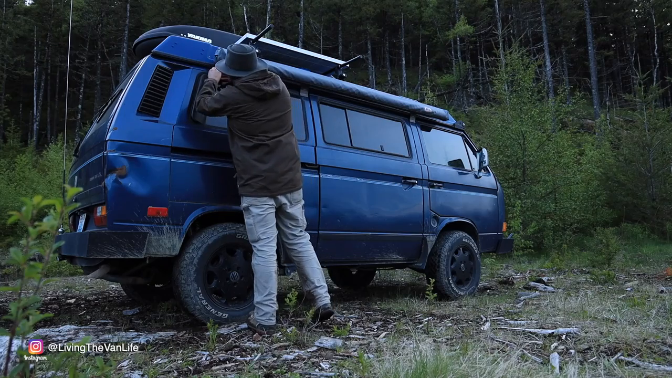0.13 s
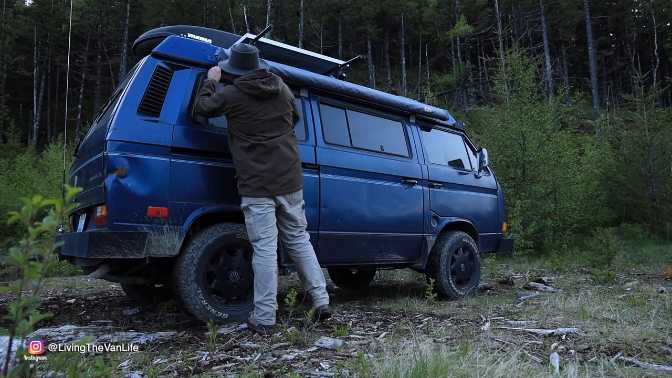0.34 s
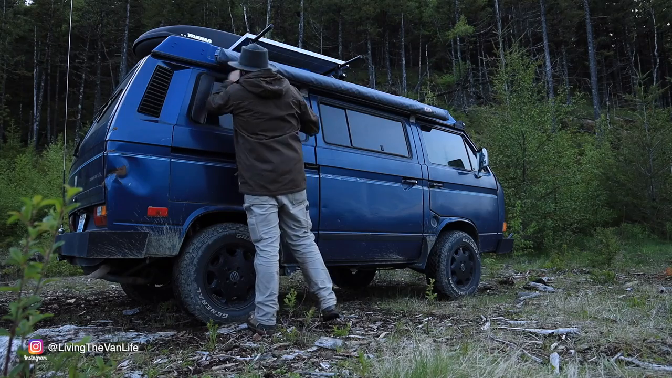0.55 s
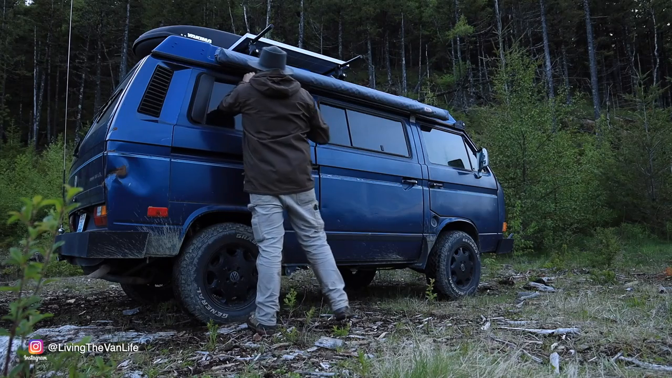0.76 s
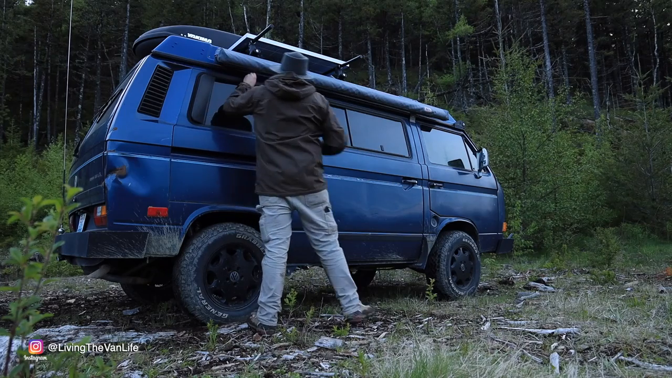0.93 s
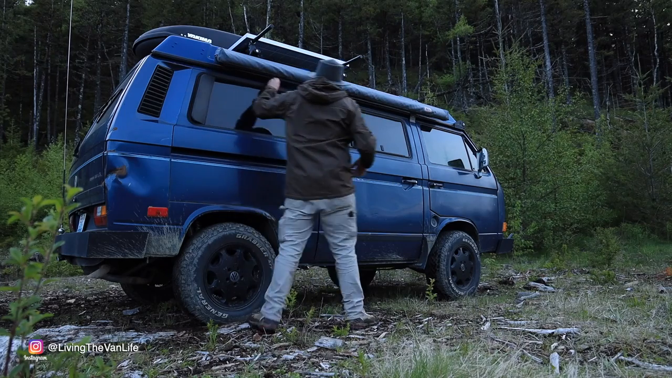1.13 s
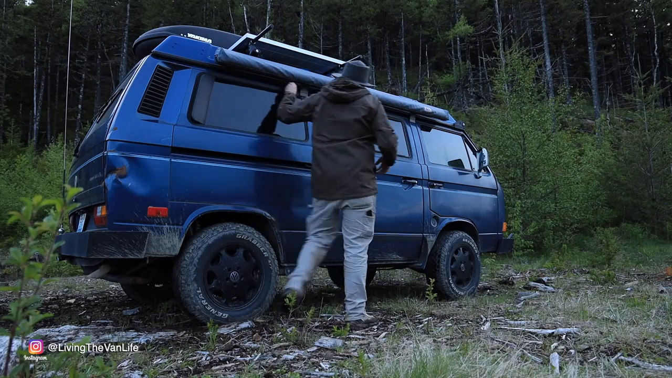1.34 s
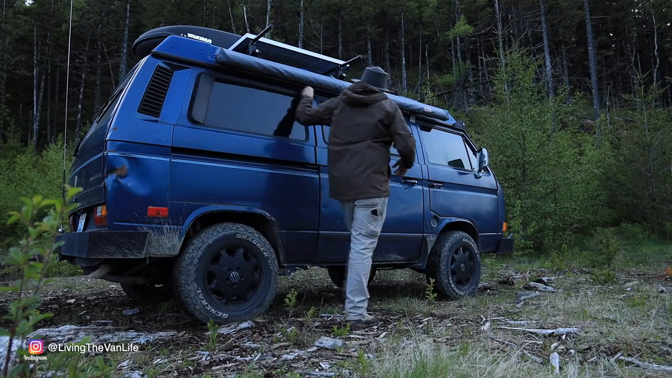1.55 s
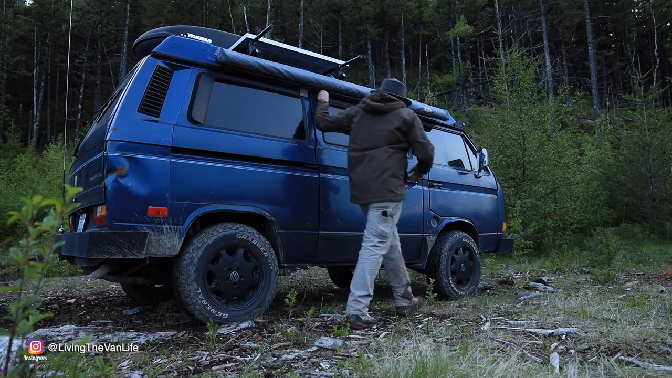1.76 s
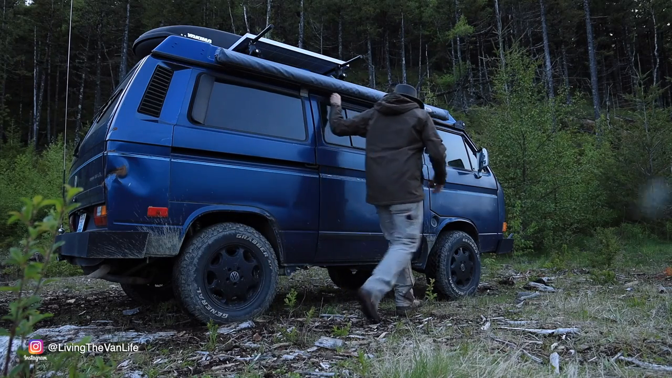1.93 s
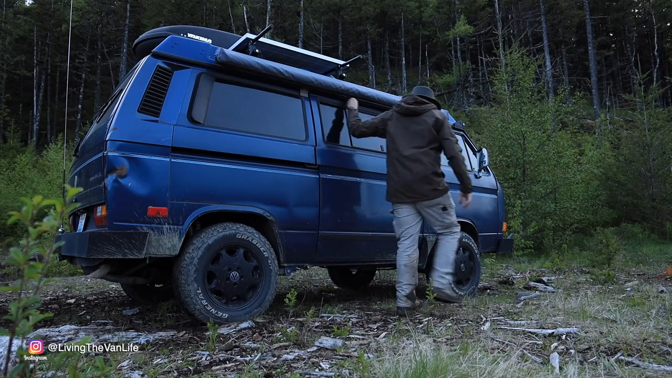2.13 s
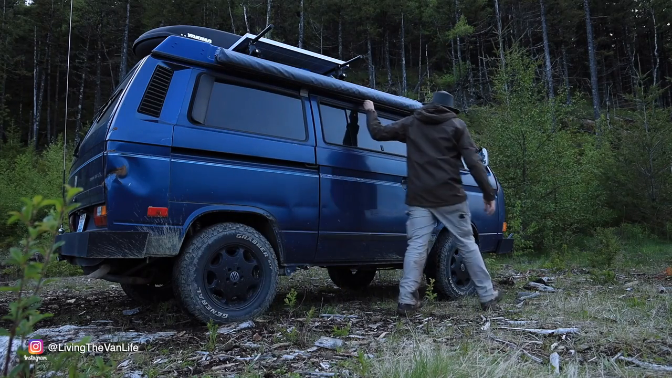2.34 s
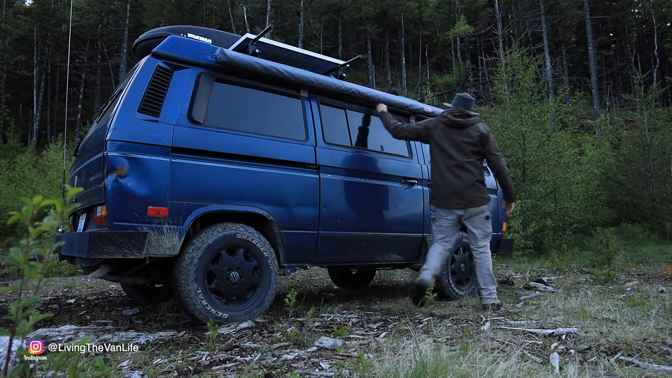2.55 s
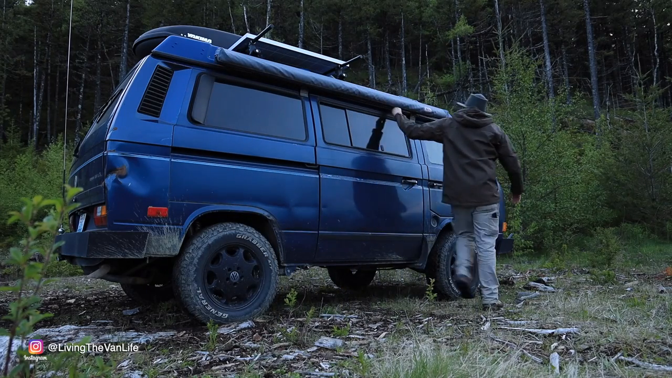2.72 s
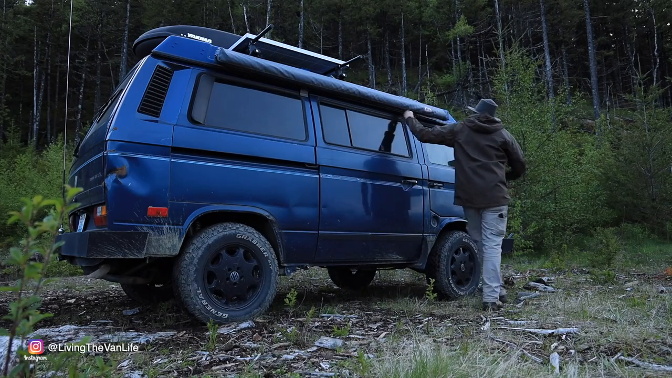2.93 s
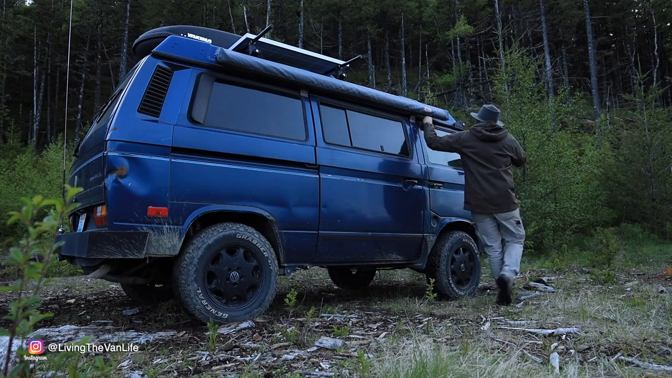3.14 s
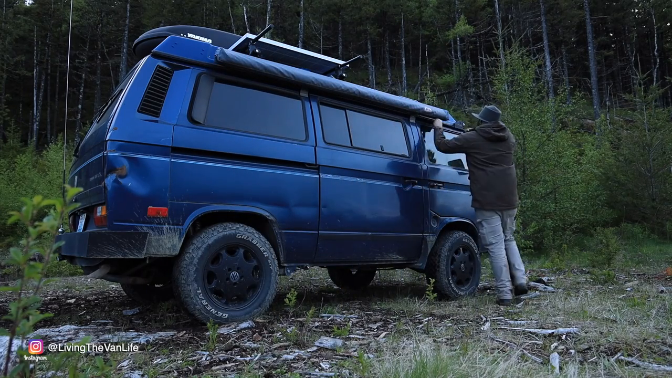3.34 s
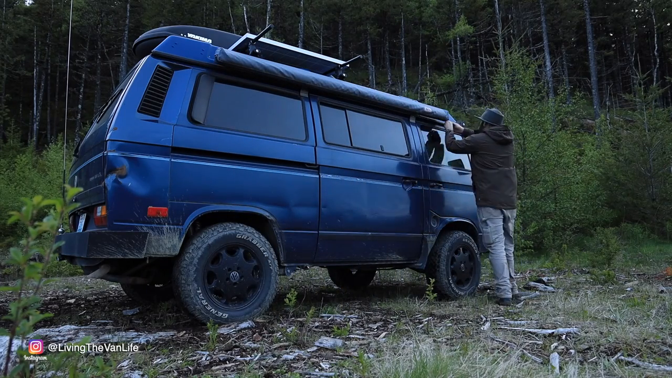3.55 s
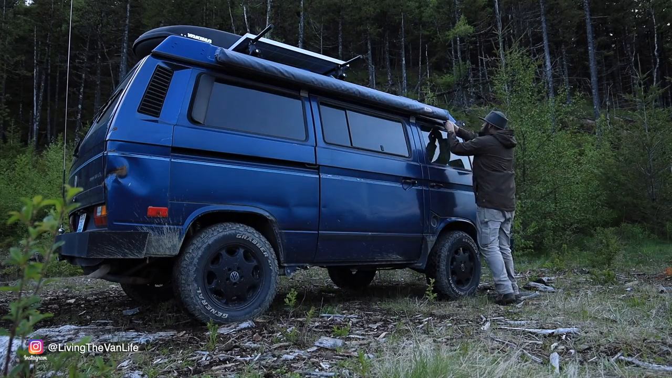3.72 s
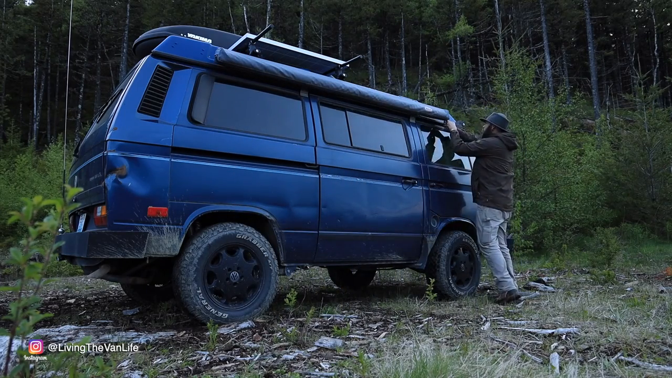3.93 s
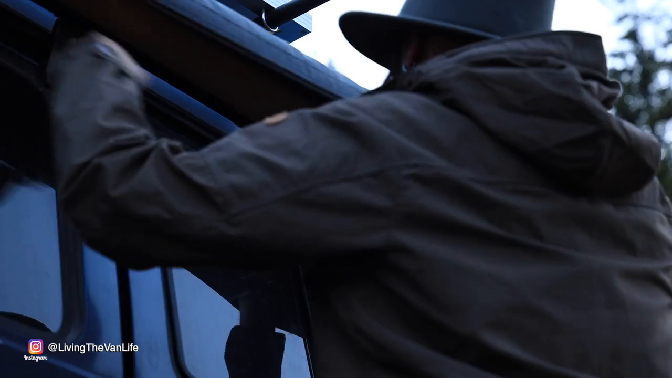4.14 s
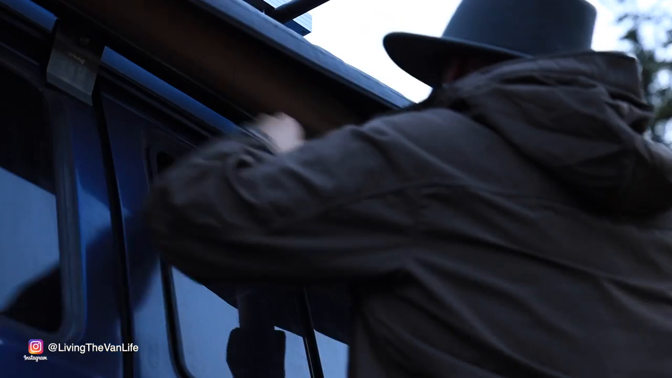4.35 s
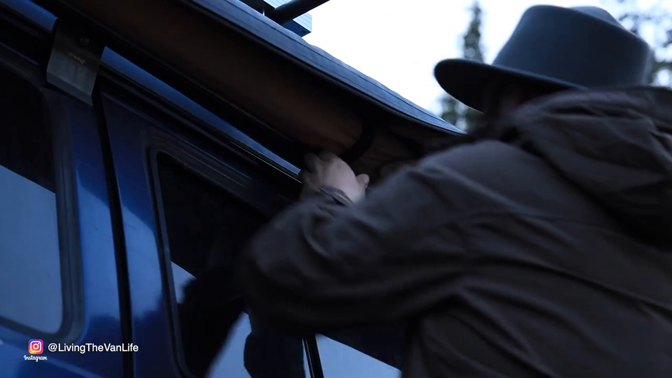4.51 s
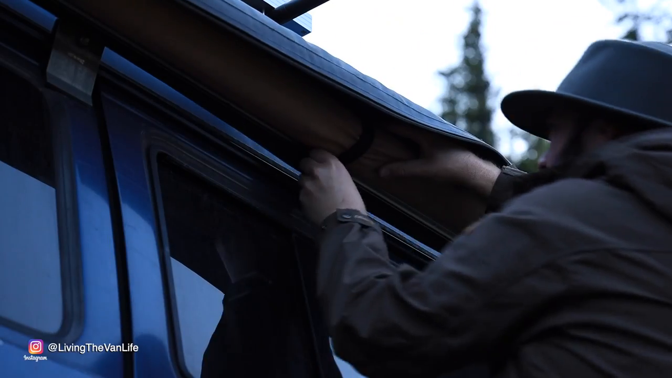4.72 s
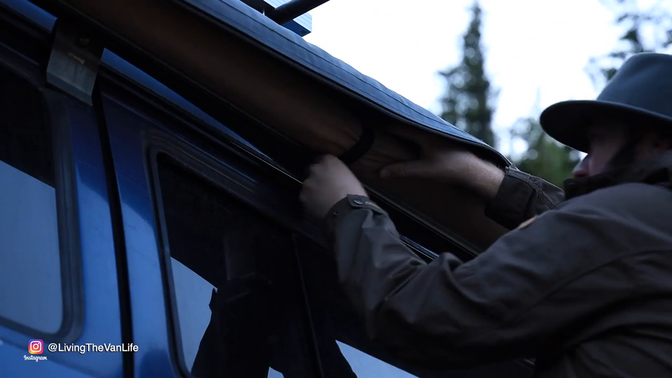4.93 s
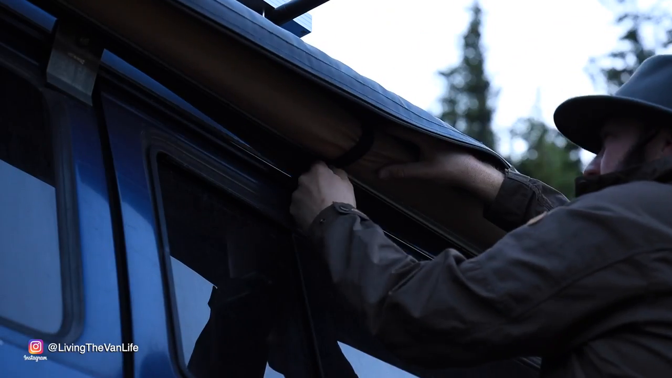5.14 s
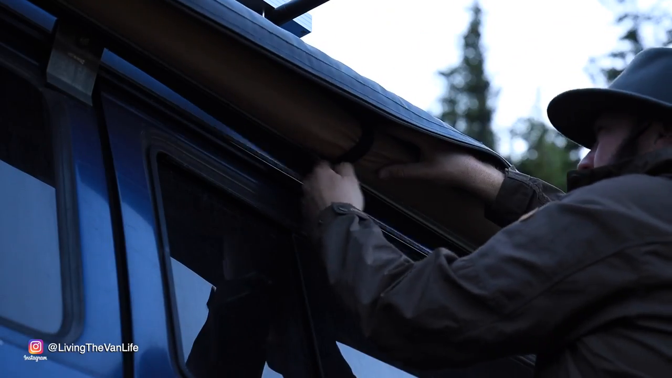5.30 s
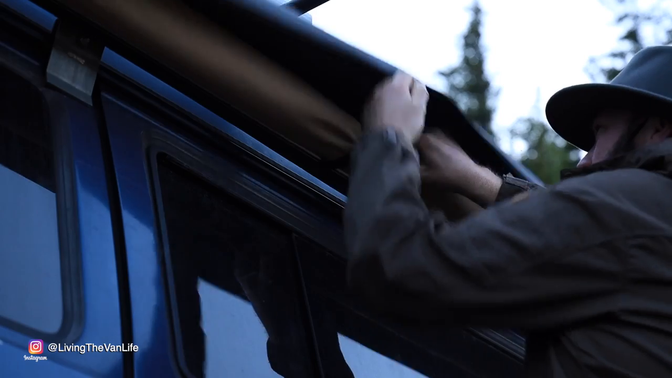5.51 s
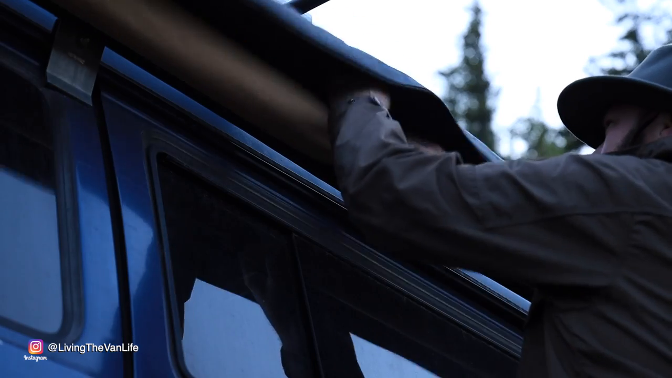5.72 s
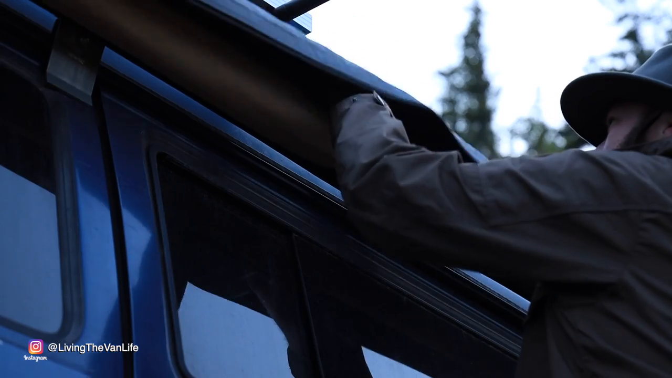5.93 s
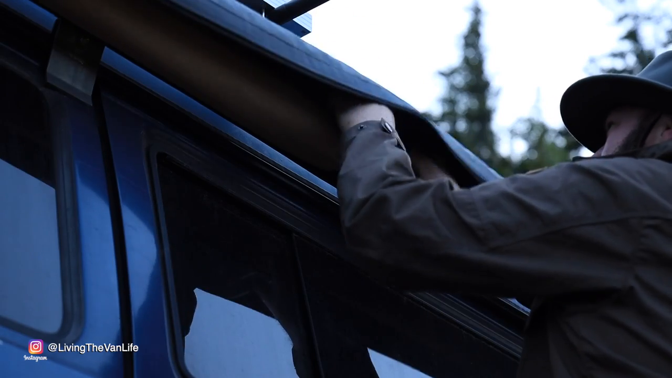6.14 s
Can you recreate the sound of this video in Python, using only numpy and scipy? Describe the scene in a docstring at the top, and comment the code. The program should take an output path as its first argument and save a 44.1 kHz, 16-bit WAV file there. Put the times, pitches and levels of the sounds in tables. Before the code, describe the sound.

A long, coarse zipper is tugged open in several buzzing strokes on a taut awning bag, then stiff fabric is handled and crinkled in quiet woods.

```python
"""A quiet forest clearing, close to an awning bag on the side of a van: a long zipper is pulled open in strokes.
The slider knocks as it is tugged free; its teeth then snap at the speed of the hand, buzz and ring the taut cover.
A last quick slip squeaks. Afterwards hands grip, crinkle and fold back the stiff cover: filtered noise and ticks.
The microphone also takes in scatter from van and ground, a dull return from the trees, still air and a low drone."""
import sys
import numpy as np
from scipy import signal
from scipy.fft import rfft, irfft
from scipy.io import wavfile
from scipy.ndimage import uniform_filter1d

SR = 44100
rng = np.random.default_rng(int(sys.argv[2]) if len(sys.argv) > 2 else 0)


def transcribe(u):
    """Save the signal u as a 16-bit wav file named by the first command-line argument.

    u: samples, shape (n,) or (channels, n), limited to [-1, 1]; the rate is SR.
    q: integer samples, one column per channel.
    """
    v = np.clip(np.atleast_2d(u).T, -1, 1)
    q = np.round(v * 32767).astype(np.int16)
    wavfile.write(sys.argv[1], SR, q)


N = 272097
TIME = np.arange(N) / SR

# spectrum of friction against the slider and cover: f/Hz, relative level/dB per Hz
SCRAPE_SPECTRUM = [(200, -11), (420, 4), (1250, 3), (3700, -6.5), (4700, -20), (16000, -40.5)]
# spectrum of bright ticks and snaps, as of a stiff crease letting go: f/Hz, relative level/dB per Hz
TICK_SPECTRUM = [(300, 3.5), (1500, 4.5), (3500, 7), (5400, -10), (7600, -7), (16000, -24.5)]


def undb(db):
    """Decibels to gain."""
    return 10 ** (np.asarray(db) / 20)


def unit(x):
    """Scale to rms 1."""
    return x / np.sqrt(np.mean(x ** 2))


def add(out, s, sound):
    """Mix a short sound in at time s."""
    i = max(int(s * SR), 0)
    out[i:i + len(sound)] += sound[:N - i]


def colour(x, points, size=2048):
    """Causal minimum-phase filter with a (Hz, dB) spectrum and unit energy."""
    hz, db = np.transpose(points)
    log_gain = np.interp(np.log(np.fft.rfftfreq(size, 1 / SR) + 1), np.log(hz), np.log(undb(db)))
    cepstrum = irfft(log_gain)[:size // 2]
    cepstrum[1:] *= 2
    response = irfft(np.exp(rfft(cepstrum, size)))
    return signal.oaconvolve(x, response / np.linalg.norm(response))[:len(x)]


def resonate(x, hz, q):
    """Two-pole resonance, gain 1 at the centre."""
    return signal.lfilter(*signal.iirpeak(hz, q, fs=SR), x)


def walk(rate):
    """Smooth random wandering with a spread near 1, given fresh values at this rate in Hz."""
    k = int(SR / rate)
    steps = np.repeat(rng.standard_normal(N // k + 1), k)
    return 1.2 * uniform_filter1d(steps, k)[:N]


def steady(x, size=900):
    """Even out the slow level over size samples and leave the grain."""
    return x / np.sqrt(np.abs(uniform_filter1d(x ** 2, size)) + 1e-9)


def forest(air_db=-50, drone_hz=47.1, drone_db=-53, q=10):
    """Still air in the trees is coloured noise; a faint low drone is noise through a narrow resonance."""
    # still air: f/Hz, relative level/dB per Hz
    air_spectrum = [(30, -5), (150, 12), (650, 3), (1200, -3), (3500, -8), (5000, -17), (16000, -24.5)]
    air = unit(colour(rng.standard_normal(N), air_spectrum)) * undb(air_db)
    drone = resonate(resonate(rng.standard_normal(N), drone_hz, q), drone_hz, q)
    return air + undb(drone_db) * steady(drone, size=2800)


def knocks(cycles=0.85, crack_s=0.0027, ring_db=-19, ring_s=0.014, bag_hz=720, snap_db=-7,
           thud_hz=175, thud_db=-24, thud_s=0.016):
    """The cover swings up and dies within a few cycles; a crack leads, and the bag thuds and rings on faintly."""
    # knocks of the slider and snaps of the taut cover:
    # t/s, level/dB, ring f/Hz, crack level/dB (before halving, relative to the knock)
    knock_list = [(0.0667, -17.5, 646, 2), (0.091, -10.5, 614, -7), (0.1668, -14.5, 585, -6),
                  (0.2972, -11.5, 590, -6), (0.445, -18.5, 467, -2), (0.456, -15.5, 517, -11),
                  (0.861, -30, 527, -9), (0.917, -34.5, 700, 6.5), (1.58, -16.5, 405, -25),
                  (2.468, -17.5, 317, -6), (3.149, -20, 606.8, 8.5), (4.184, -13, 580, -10),
                  (4.45, -23, 1120, -6.5), (5.088, -12.5, 774, -20), (5.4764, -4.5, 440, -36),
                  (5.736, -22, 388, -3), (5.879, -21, 523, 8.5)]
    out, t = np.zeros(N), TIME[:SR // 10]
    for s, db, hz, crack_db in knock_list:
        noise = rng.standard_normal((3, len(t)))
        age = t * hz / cycles  # 1 at the height of the swing
        swing = -(age * np.exp(1 - age)) ** 2 * np.cos(2 * np.pi * hz * t + np.pi)
        grit = colour(noise[0], SCRAPE_SPECTRUM) + undb(snap_db) * colour(noise[2], TICK_SPECTRUM)
        crack = .5 * grit * np.exp(-t / crack_s)
        ring = unit(resonate(resonate(noise[1], hz, q=1.6), bag_hz, q=10.0)) * np.exp(-t / ring_s)
        thud = np.sin(2 * np.pi * thud_hz * t) * np.exp(-t / thud_s)
        knock = swing + undb(crack_db) * crack + undb(ring_db) * ring + undb(thud_db) * thud
        add(out, s, undb(db) * knock)
    return out


def pulling(overlap=12, crawl_hz=175.04, shape=1.7, uneven_per_octave=0.1705, treble_db_per_octave=2):
    """Each pull speeds up and slows down; level, unevenness and treble follow its speed, and the fastest leads."""
    # pulls of the hand on the slider: t/s at top speed, top speed f/Hz in teeth per second, speed-up t/s,
    # slow-down t/s, level/dB at top speed, level lost/dB per octave of slowing, unevenness 0-1 at top speed,
    # cover resonance f/Hz, its lift/dB, treble level/dB at top speed
    pulls = [(0.558, 702.3, 0.1, .125, -23.5, 4, 0.24, 496, 8.5, 5.5),
             (0.96, 229.5, 0.039, 0.068, -26, 2, 0.47, 493, 7, 3.5),
             (1.075, 475, 0.09, 0.27, -19.5, 11.5, 0.29, 406.8, 3.5, 5.5),
             (1.399, 376, .24, .095, -25, 11, 0.48, 1080, 6, 5.5),
             (1.502, 387.7, .2, 0.18, -23, 2.5, .4, 388.3, 5.5, 5.5),
             (1.81, 368.6, 0.41, 0.35, -23.5, 13, 0.52, 1147, 7, 5),
             (2.128, 675.2, 0.051, 0.17, -23.5, 3, 0.26, 1122, 7.5, 7),
             (2.255, 469.7, 0.048, 0.099, -24, 10.5, 0.34, 1169, 2.5, 6.5),
             (2.455, 284.4, 0.076, 0.21, -28, 7.5, 0.59, 1130, 7, 0),
             (2.579, 875.4, 0.088, .125, -22.5, 4.5, .27, 851, 8.5, 7),
             (2.998, 662.6, 0.19, .2, -24, 6, .3, 1260, 4.5, 7.5),
             (3.125, 515, 0.1, 0.18, -26.5, 6, 0.4, 1300, 8, 4.5),
             (3.437, 352.3, 0.65, 0.22, -26, 18.5, 0.43, 720, 8.5, 1),
             (3.525, 498.5, 0.13, 0.035, -22, 5.5, 0.31, 502.3, -2.5, -4)]
    columns = np.transpose(pulls)[:, :, None]
    s, top_hz, rise_s, fall_s, db, swell_db, uneven, cover_hz, cover_db, treble_db = columns
    t = TIME[::40]  # hand motion is slow enough for a coarse clock
    age = np.abs(t - s) / np.where(t < s, rise_s, fall_s)
    # shape 1 is a pointed jerk, 2 a round bell
    speed = top_hz * np.exp(-np.minimum(age ** shape, 4))
    slower = np.log2(top_hz / speed)  # octaves under top speed
    # slowing down makes the teeth stumble and dulls them; each pull keeps at least a crawl
    controls = (np.maximum(speed, crawl_hz),
                db - swell_db * slower,
                np.minimum(uneven + uneven_per_octave * slower, .6),
                cover_hz,
                cover_db,
                treble_db - treble_db_per_octave * slower)
    lead = (speed / speed.max(0)) ** overlap
    return [np.interp(TIME, t, (lead * c).sum(0) / lead.sum(0)) for c in controls]


def clicks(places, sizes, order=8):
    """Band-limited impulses at fractional sample places."""
    out = np.zeros(N)
    taps = places.astype(int)[:, None] + np.arange(1 - order, order + 1)
    offset = taps - places[:, None]
    kernel = np.sinc(offset) * np.sinc(offset / order)
    np.add.at(out, np.clip(taps, 0, N - 1), sizes[:, None] * kernel)
    return out


def folds(x, spread_s=0.003013, drift_s=0.00018, count=6):
    """Paths of drifting length through the folds of the cover, added with alternating sign."""
    out = np.zeros(N)
    for k in range(count):
        arrival = TIME - spread_s * rng.random() - drift_s * walk(18)
        out += (-1) ** k * np.interp(arrival, TIME, x)
    return out


def flexing(x, strain, flex_db=3.8, lowest_hz=450, q=4, count=7):
    """The cover flexes under strain: resonances half an octave apart swell and fade, and break up the tone."""
    for k in range(count):
        lift_db = flex_db * np.sqrt(strain) * np.clip(walk(70), -2, 1)
        x = x + (undb(lift_db) - 1) * resonate(x, lowest_hz * 2 ** (k / 2), q)
    return x


def glide_resonance(x, hz, width_hz):
    """Resonance whose centre moves: turn the sound down to 0 Hz, smooth it, turn it back."""
    turn = np.exp(2j * np.pi * np.cumsum(hz) / SR)
    pole = np.exp(-np.pi * width_hz / SR)
    return 2 * np.real(turn * signal.lfilter([1 - pole], [1, -pole], x * turn.conj()))


def zipper(jitter=0.08, waver=.08, scatter_db=3, scrape_s=0.0019, scrape_db=-5.5, cover_width_hz=140,
           treble_hz=1700, fold_hz=520, surge_db=1.0, judder_db=0.96, patch_q=7.0, start_s=0.053, stop_s=0.028):
    """Each tooth snaps out of the slider, rings the cover and scrapes briefly."""
    # ring of one tooth: f/Hz, relative level/dB per Hz
    tooth_spectrum = [(150, -19), (250, -3), (400, 8), (700, 4.5), (950, -1.5), (1200, 5), (1550, -2),
                      (3700, -8.5), (4600, -19.5), (7000, -26.5), (16000, -40.5)]
    # stretches where the slider runs free, sticking in between: from t/s, to t/s
    runs = [(0.425, 0.729), (0.907, 3.65)]
    # patches of cover the slider passes, tight ones ring out and slack ones swallow a pitch:
    # t/s at the middle, Gaussian half length t/s, ring f/Hz, lift level/dB
    patches = [(0.524, 0.0077, 560, 5.5), (0.587, 0.025, 2070, 9), (0.652, 0.024, 1470, 14),
               (1.375, 0.028, 3600, 9.5), (1.414, .012, 1111, 6.5), (1.898, 0.023, 4160, 11),
               (1.886, .025, 5180, 14.5), (2.128, 0.019, 673, 11.5), (2.161, .014, 1187, 8),
               (2.291, 0.017, 1190, 12), (2.522, 0.011, 1140, 11), (2.57, 0.026, 4064, 8),
               (2.669, .035, 1263, 8.5), (2.84, 0.023, 729.3, 11.5), (3.025, 0.031, 1230, 6.5),
               (3.195, 0.021, 798.6, 12), (3.333, 0.11, 336, -13)]
    rate, level_db, uneven, cover_hz, cover_db, treble_db = pulling()
    passed = np.cumsum(rate * (1 + waver * uneven * walk(90))) / SR  # teeth so far
    teeth = np.arange(1, int(passed[-1]))
    chance = rng.standard_normal((len(teeth), 2)).T
    rough = np.interp(teeth, passed, uneven)
    places = np.interp(teeth + jitter * rough * chance[0], passed, np.arange(N))
    snaps = -clicks(places, undb(scatter_db * rough * chance[1]))

    # friction dies away quickly after each tooth, so slow pulls rasp and fast ones sing
    grip = signal.lfilter([1], [1, -np.exp(-1 / (scrape_s * SR))], snaps)
    friction = steady(colour(grip * rng.standard_normal(N), SCRAPE_SPECTRUM))
    # the buzz takes on the tooth resonances
    buzz = colour(steady(snaps), tooth_spectrum) + 2 * uneven * undb(scrape_db) * friction

    # slow teeth click dryly; fast ones shake the folds, which scatter their treble
    treble = signal.sosfiltfilt(signal.butter(2, treble_hz, "high", fs=SR, output="sos"), buzz)
    fold = rate / fold_hz  # at 1 as much treble is scattered as goes straight through
    scattered = (treble + fold * np.std(treble) * steady(folds(treble))) / np.hypot(1, fold)
    brightened = buzz - treble + undb(treble_db + surge_db * walk(40)) * scattered
    buzz = flexing(brightened, np.minimum(fold, 1) ** 2)

    # the taut stretch of cover beside the slider rings at its own pitch
    buzz = buzz + (undb(cover_db) - 1) * glide_resonance(buzz, cover_hz, cover_width_hz)
    moving = np.zeros(N)
    for start, stop in runs:
        # it takes start_s to get going and stop_s to come to rest
        moving += np.clip(np.minimum((TIME - start) / start_s, (stop - TIME) / stop_s), 0, 1)
    buzz = steady(buzz, size=4400) * undb(level_db + judder_db * uneven * walk(110)) * moving

    out = buzz.copy()
    for s, length, hz, db in patches:
        nearness = np.exp(-.5 * ((TIME - s) / length) ** 2)
        out += (undb(db) - 1) * nearness * resonate(buzz, hz, patch_q)
    return out


def ticks(snap_s=0.0016, tail_db=-12.0, tail_s=0.01, gain_db=-7.0, crackle_db=4):
    """A tooth or a crease lets go in a bright tick of noise with a short crackling tail."""
    # bright ticks: one zipper tooth at the first pull, then creases of the stiff cover flipping over:
    # t/s, level/dB (before gain_db and the tick spectrum)
    tick_list = [(0.435, -27.5), (5.037, -25), (5.109, -25), (5.312, -24.5), (5.341, -18), (5.37, -15.5),
                 (5.392, -14.5), (5.406, -16), (5.435, -15), (5.448, -30), (5.463, -13), (5.491, -20),
                 (5.496, -19.5), (5.514, -19), (5.547, -22)]
    out, t = np.zeros(N), TIME[:SR // 20]
    crackle = unit(undb(crackle_db * walk(900)))
    for s, db in tick_list:
        tail = undb(tail_db) * np.exp(-t / tail_s) * np.interp(s + t, TIME, crackle)
        add(out, s, undb(db + gain_db) * (np.exp(-t / snap_s) + tail) * rng.standard_normal(len(t)))
    return colour(out, TICK_SPECTRUM)


def bumps(q=1.0):
    """Soft pushes of air and ground: noise swelling and fading, each round its own low pitch."""
    # dull bumps of boots and billowing cloth: t/s at the middle, level/dB, Gaussian half length t/s, f/Hz
    pushes = [(1.785, -32.5, 0.021, 165), (2.822, -28.5, 0.014, 299.4), (4.897, -38, 0.0097, 332.4),
              (5.648, -39.5, 0.022, 133), (5.724, -32, 0.017, 170), (5.879, -30, 0.0066, 270)]
    out = np.zeros(N)
    for s, db, length, hz in pushes:
        low = resonate(resonate(rng.standard_normal(N), hz, q), hz, q)
        out += undb(db) * steady(low) * np.exp(-.5 * ((TIME - s) / length) ** 2)
    return out


def squeak(waver=.06, overtone_db=-21, rasp_db=-9, air_db=-25):
    """A last quick slip at the end of the bag: a gliding whistle, faint overtones, a light rasp and airy hiss."""
    # course of the whistle: t/s, f/Hz (before wavering), level/dB
    glide = [(3.722, 903, -48), (3.737, 995, -35.5), (3.795, 1152, -30), (3.814, 1167, -35.5),
             (3.832, 1898, -40.5), (3.847, 1230, -38.5), (3.878, 847, -49)]
    s, hz, db = np.transpose(glide)
    phase = 2 * np.pi * np.cumsum(np.interp(TIME, s, hz) * (1 + waver * walk(600))) / SR
    whistle = unit(np.sin(phase) + undb(overtone_db) * (np.sin(2 * phase) + np.sin(3 * phase)))
    noise = rng.standard_normal(N)
    grip = undb(np.interp(TIME, s, db)) * (TIME > s[0]) * (TIME < s[-1])
    hiss = undb(rasp_db) * colour(noise, SCRAPE_SPECTRUM) + undb(air_db) * noise
    # the rasp swells less than the tone
    return grip * whistle + np.sqrt(grip * grip.max()) * hiss


def rustle(grain_db=7, flutter_db=2.0, ring_db=2, q=2.5, attack_s=0.0086, release_s=0.019,
           handling_s=4.13, sleeves_db=-51):
    """Cloth slides on cloth in tiny uneven slips; each rub swells, holds, dies away and rings its patch of cover."""
    # cloth on cloth: f/Hz, relative level/dB per Hz
    cloth_spectrum = [(100, -11), (400, -1.5), (1100, -7), (1600, -9), (3600, -10.5), (4700, -22),
                      (7500, -25), (16000, -40.5)]
    # rubs of hands and sleeves along the cover: start t/s, length t/s, level/dB, ring f/Hz
    rubs = [(4.129, 0.037, -40.5, 695), (4.172, 0.065, -36.5, 413), (4.304, 0.1, -47.5, 1310),
            (4.442, 0.11, -41, 1140), (4.582, 0.17, -47.5, 1190), (4.788, 0.14, -44, 1140),
            (5.106, 0.016, -37, 950), (5.313, 0.175, -33, 990), (5.532, 0.2, -38.5, 440),
            (5.744, 0.089, -33.5, 696), (5.92, 0.25, -40.5, 590)]
    slips = rng.standard_normal(N) * undb(grain_db * np.minimum(walk(2500), 2) + flutter_db * walk(60))
    cloth = unit(colour(slips, cloth_spectrum))
    # from handling_s on the sleeves stir faintly
    sleeves = unit(colour(rng.standard_normal(N), cloth_spectrum))
    out = undb(sleeves_db) * (TIME > handling_s) * sleeves
    for s, length, db, hz in rubs:
        attack = np.clip((TIME - s) / attack_s, 0, 1)
        release = np.exp(-np.maximum(TIME - s - length, 0) / release_s)
        out = out + undb(db) * attack * release * unit(cloth + undb(ring_db) * resonate(cloth, hz, q))
    return out


def scuffs(grain_db=4):
    """A hand slips over the weave in a short gritty burst of noise."""
    # scuffs of hands on the cover: t/s at the middle, level/dB, half length t/s (where it is 3 dB down)
    slips = [(4.237, -27.5, 0.0011), (4.536, -20.5, 0.0035), (4.663, -26.5, 0.0068), (5.091, -29.5, 0.0043),
             (5.88, -37, 0.0046)]
    # hand on weave: f/Hz, relative level/dB per Hz
    scuff_spectrum = [(500, -8.5), (1250, 10), (2100, -3), (3600, -1.5), (5200, -14.5), (16000, -44)]
    pressure = sum(undb(db) / np.hypot(1, ((TIME - s) / length) ** 2) for s, db, length in slips)
    grit = unit(rng.standard_normal(N) * undb(grain_db * walk(900)))
    return colour(pressure * grit, scuff_spectrum)


def clearing(x, near_db=-15, near_s=0.0029, trees_db=-32, trees_s=0.22):
    """Direct sound, quick scatter from van and ground, then a faint dull return from the trees."""
    t = TIME[:SR // 2]
    near, trees = rng.standard_normal((2, len(t))) * [t * np.exp(-t / near_s), t * np.exp(-t / trees_s)]
    trees = resonate(trees, 2100, q=0.3)
    response = undb(near_db) * near / np.linalg.norm(near) + undb(trees_db) * trees / np.linalg.norm(trees)
    return x + signal.fftconvolve(x, response)[:N]


def scene():
    """Zipper and cover in the open air, over the still air of the forest."""
    handled = knocks() + zipper() + ticks() + bumps() + squeak() + rustle() + scuffs()
    return (forest() + clearing(handled))[None]


def record(dry, low_hz=36, top_hz=15900):
    """The recorder behind the microphone cuts the deepest bass and the top."""
    dry = signal.sosfilt(signal.butter(4, low_hz, "high", fs=SR, output="sos"), dry)
    return signal.sosfilt(signal.ellip(10, .2, 70, top_hz, fs=SR, output="sos"), dry)


dry = scene()
out = record(dry)
transcribe(out)
```